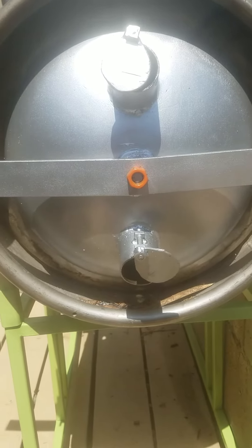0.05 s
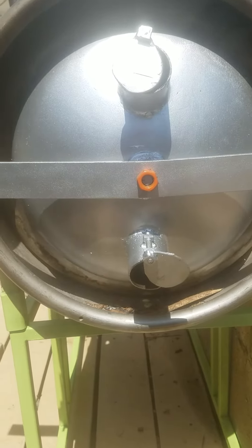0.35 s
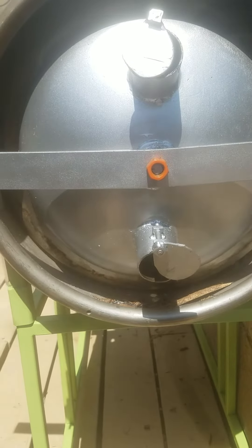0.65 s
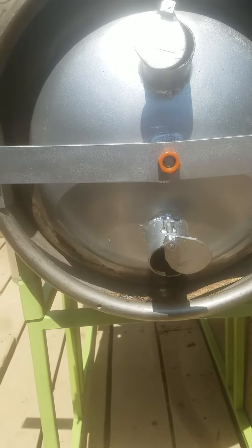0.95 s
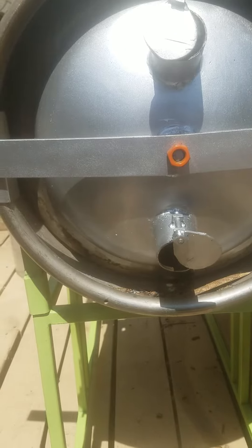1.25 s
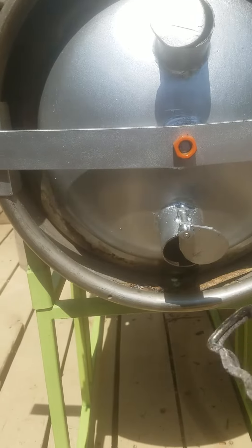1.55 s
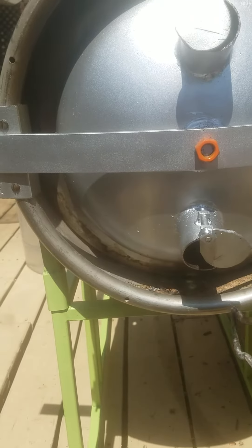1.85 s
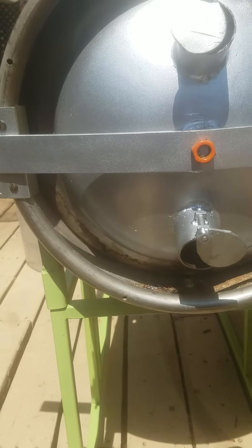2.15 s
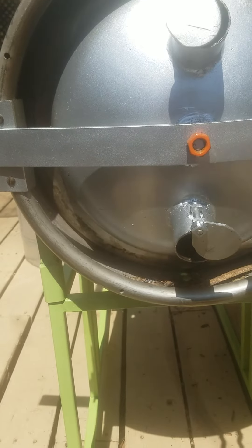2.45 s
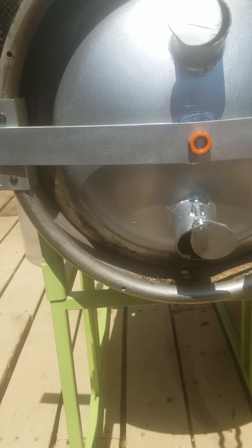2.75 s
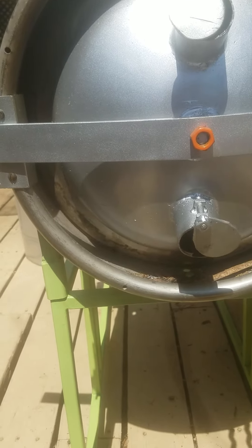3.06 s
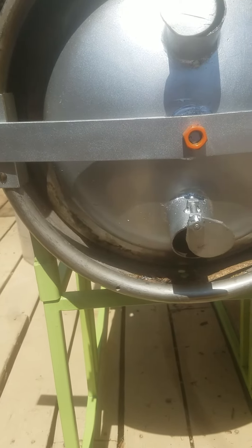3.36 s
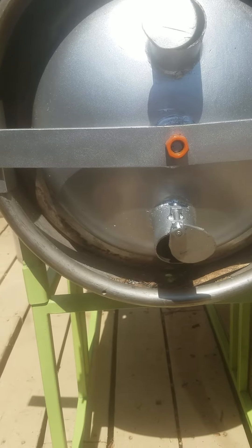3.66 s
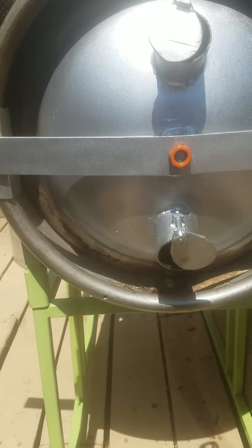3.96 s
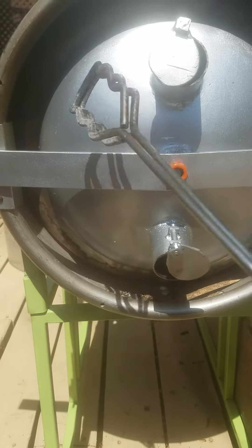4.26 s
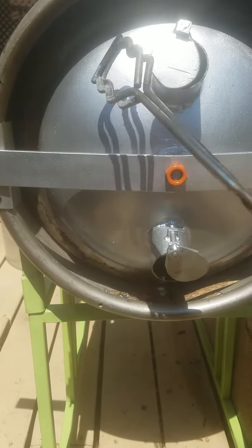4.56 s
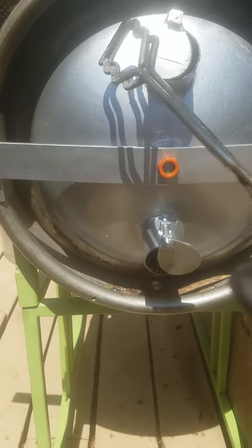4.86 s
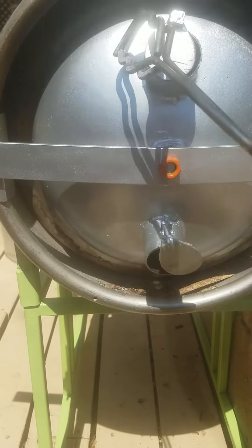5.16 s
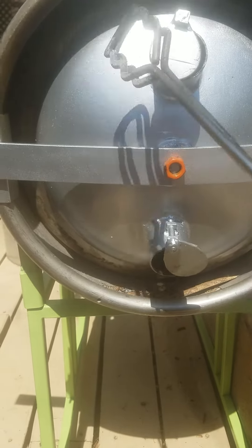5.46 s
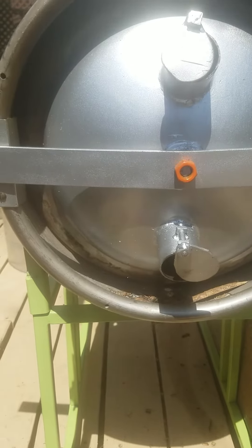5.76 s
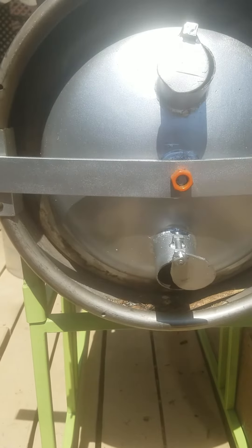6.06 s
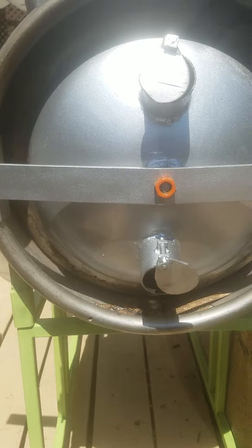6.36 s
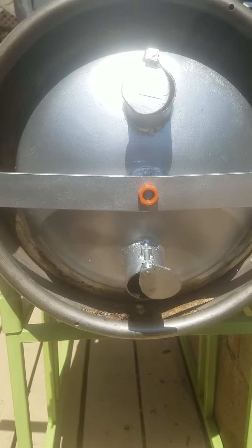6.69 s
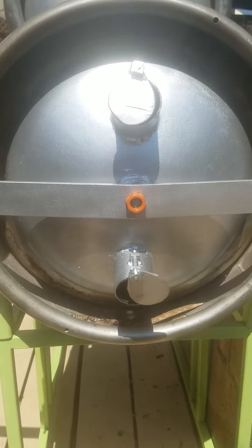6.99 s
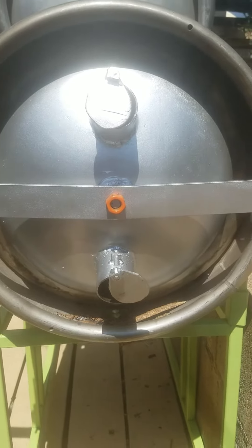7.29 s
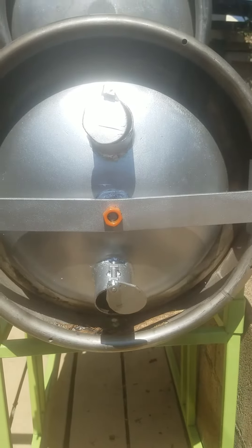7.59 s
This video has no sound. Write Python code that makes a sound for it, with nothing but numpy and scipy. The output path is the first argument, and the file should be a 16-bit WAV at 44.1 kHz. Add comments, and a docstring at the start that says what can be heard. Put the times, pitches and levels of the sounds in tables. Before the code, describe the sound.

Metal tongs tick faintly as they are handled, then give one bright, sharp click. They knock once on the rim of a steel keg, which rings briefly. After a pause come three quick, chattering taps on the keg's dome, each with a short metallic ring and a faint low boom. A few small ticks and a soft bump follow. It is all close by, outdoors, over a faint machine hum and distant rush.

```python
"""Steel tongs on a steel keg

Outdoors on a wooden deck, wire tongs click, knock once on the rim of an upturned keg, then tap
its domed end three times. Each hit bounces and sets the steel ringing: a few clear tones (modes)
and a wash of tones so crowded that they sound like noise. The tongs tick and slip in the hand,
which bumps softly once. A machine hums over the rush of the neighbourhood."""
import sys
import numpy as np
from scipy import signal
from scipy.fft import rfft, irfft, next_fast_len
from scipy.io import wavfile

SR = 44100
rng = np.random.default_rng(int(sys.argv[2]) if len(sys.argv) > 2 else 0)


def wrap_up_sound(samples):
    """Save the sound to the file named by the first command line argument, as 16-bit audio."""
    columns = np.atleast_2d(samples).T
    # keep every value between -1 and 1, then stretch to whole-number steps
    tamed = np.clip(columns, -1, 1)
    steps = np.round(tamed * 32767).astype(np.int16)
    wavfile.write(sys.argv[1], SR, steps)


N = 340893
RING_SIZE = 2 ** 15   # longest ring, in samples

# taps on the dome: (time [s], strength [dB], brightness [dB/octave], bounces weaker by [dB],
# chatter length [s], boom level [dB])
DOME_TAPS = [(4.3879, 1, -0.24, 15, .018, -34.5), (4.6877, 1.5, 0.2, 6, .055, -30.5),
             (4.9973, 4, 0.04, 6, 0.027, -36)]
# how long the keg's wash lasts: (pitch [Hz], time to fade by 60 dB [s])
KEG_DECAY = [(200, 0.19), (1000, 0.32), (3000, 0.18), (6000, 0.17), (14000, 0.11)]
# the microphone's two openings: (pitch [Hz], how alike they sound [0-1], left one's lead [radians])
MIC_PORTS = [(60, .72, 0), (130, .88, 0), (400, .62, .5), (750, .6, .1), (1100, .5, -.3), (1400, .4, .2),
             (1750, .6, 2.3), (2400, .45, 2.1), (3300, .15, .5), (6000, .05, 0)]


def dome(ring_db=-0.05):
    """Three chattering taps ring the dome; after two, the tongs fall back with a hollow knock."""
    # the dome's clear tones: (pitch [Hz], level [dB], fade time [s], left over right [dB])
    modes = [(745, -41, .2, 0), (770, -37, .22, -1), (910, -42, .28, 0), (1063, -28, .2, -2),
             (1148, -37, .25, -5), (1255, -43, .25, 1), (1410, -42, .2, 5), (1665, -23.5, .09, 1),
             (1755, -18.5, .1, 0), (1855, -28, .13, 3), (2144, -39, .3, 3), (2177, -37, .28, -1),
             (2627, -45, .42, 7), (2850, -34, .12, 7), (3040, -45, .3, 0), (3215, -25.5, .23, 1),
             (3320, -27, .21, -2), (3470, -39, .17, -3), (3540, -40, .17, 0), (3952, -41, .2, 6),
             (4135, -39.5, .21, -4), (4850, -47, .2, 0), (5980, -48.5, .15, 4), (8780, -48, .13, 0)]
    # the dome's crowded tones: (pitch [Hz], level [dB])
    spectrum = [(90, -52), (300, -25), (620, -24.5), (780, -23.5), (1100, -10.5), (1400, -17.5),
                (1750, -14), (2500, -17.5), (3200, -11), (3900, -19.5), (6000, -23), (8500, -25.5),
                (10300, -36.5), (12000, -21), (15500, -27.5)]
    # the tongs fall back: (time [s], strength [dB], brightness [dB/octave], hollow knock [dB])
    rebounds = [(4.721, -5.5, -3, -9.5), (5.055, -11.5, -3.5, 1.5)]
    # the hollow knock's tone colour: (pitch [Hz], level [dB])
    hollow_spectrum = [(200, -34.5), (420, -22), (540, -18.5), (650, -26), (780, -1), (930, -25.5),
                       (1080, -12), (1300, -20), (2500, -30), (6000, -53.5)]
    # how long it lasts: (pitch [Hz], fade time [s])
    hollow_decay = [(500, 0.17), (1100, 0.13), (4000, .1)]
    taps = chatter(DOME_TAPS, lag_s=.005, gap_s=.0088, fade_db=16)
    taps = sorted(taps + [(s, db, tilt_db) for s, db, tilt_db, _ in rebounds])
    # the hollow knock comes twice, as each arm lands
    falls = [(s + lag_s, db, 0) for s, _, _, db in rebounds for lag_s in (0, .0088)]
    tones = from_db(ring_db) * ring(taps, modes, build_cycles=1.8, jolt=.6)
    clash = wash(taps, spectrum, KEG_DECAY, crack_db=.53, crack_t60=.025, ripple_db=5.5)
    hollow = wash(falls, hollow_spectrum, hollow_decay, crack_db=.53, crack_t60=.025, ripple_db=-4)
    return tones + panned(1.0) * clash + hollow


def boom(air_hz=128.3, end_hz=133.7, end_share=0.19, t60=0.58, build_s=.012):
    """Two close low tones give each tap a low boom that fades unevenly."""
    out, t = np.zeros((2, N)), np.arange(RING_SIZE) / SR
    lag = 2 * np.pi * (end_hz - air_hz) * 0.078   # the two swing together a moment after the tap
    pair = np.sin(2 * np.pi * air_hz * t) + end_share * np.sin(2 * np.pi * end_hz * t - lag)
    tone = pair * fade(t, t60) * (1 - np.exp(-t / build_s))
    for s, *_, db in DOME_TAPS:
        add(out, from_db(db) * tone[None], s)
    return out


def rim(ring_db=3.0):
    """One bouncing knock rings the keg's rim."""
    # the knock: (time [s], strength [dB], brightness [dB/octave], bounces weaker by [dB], length [s])
    hits = [(2.4966, -3, -1.55, 5, 0.027)]
    # the rim's clear tones: (pitch [Hz], level [dB], fade time [s], left over right [dB])
    modes = [(378, -35, .15, 3), (530, -33, .14, 4), (745, -36, .14, 1), (923, -29, .11, 2),
             (1036, -15.5, .08, 1), (1060, -16.5, .08, 0), (2177, -27.5, .23, 6), (2255, -29.5, .16, 5),
             (2574, -28, .44, -3), (3215, -29, .19, 0), (3320, -37, .24, -1), (3466, -36, .17, 3),
             (3541, -35, .17, 0), (3831, -40, .23, -5), (3904, -39, .21, 5), (4135, -41, .22, 4),
             (4524, -42, .22, 0), (7348, -48, .13, 3)]
    # the rim's crowded tones: (pitch [Hz], level [dB])
    spectrum = [(150, -50), (400, -18.5), (1000, -21), (1300, -21), (2000, -20.5), (2250, -7.5),
                (2900, -12), (3300, -10), (4400, -17.5), (5400, -20), (6300, -34), (7400, -20.5),
                (9000, -32.5), (15000, -30)]
    knocks = chatter(hits, lag_s=.005, gap_s=.0105, fade_db=15)
    tones = from_db(ring_db) * ring(knocks, modes, build_cycles=5.5, jolt=.3)
    clash = wash(knocks, spectrum, KEG_DECAY, crack_db=4.2, crack_t60=.029, ripple_db=7)
    return tones + panned(3.6) * clash


def tong_clicks(ring_db=-1.0):
    """The thin steel arms click brightly, and the hand soon stops their ringing."""
    # tip clicks: (time [s], strength [dB], brightness [dB/octave], bounces weaker by [dB], length [s])
    clicks = [(.0897, -23, -5, 0, 0), (.5477, -20, -4, 0, 0), (.617, -15, -4.5, 0, 0),
              (.856, -23.5, -0.5, 9, 0.016), (.9328, -22, -8.5, 0, 0), (1.3887, -18, -4.5, 0, 0),
              (1.51, -26.5, -7, 0, 0), (1.9912, 1.5, 0.3, 7.5, .035), (3.098, -20.5, -10, -5, 0.00074),
              (5.597, -35, -2.5, -1, 0.0014)]
    # the arms' clear tones: (pitch [Hz], level [dB], fade time [s], left over right [dB])
    modes = [(1977, -40, 0.0826, 4), (3300, -44, 0.1, -4), (3750, -45.5, 0.073, 0.5), (4188, -47, 0.1, 1),
             (4860, -47, 0.1154, 1), (7250, -45.5, 0.067, 3), (10560, -43, 0.0713, -2.5),
             (11700, -32.5, 0.07, -2.5), (12050, -35.5, 0.092, -3.5), (14600, -39.5, 0.07, 2)]
    # the arms' crowded tones: (pitch [Hz], level [dB])
    spectrum = [(300, -44.5), (1200, -30.5), (2200, -23.5), (2700, -33), (3700, -26.5), (5200, -26.5),
                (7500, -27), (9200, -36), (10800, -21.5), (12200, -5), (15500, -19)]
    # how long those last: (pitch [Hz], fade time [s])
    decay = [(1000, 0.044), (4000, 0.089), (13000, 0.033)]
    touches = sorted(chatter(clicks, lag_s=.014, gap_s=.0166, fade_db=4) + stray_ticks())
    tones = from_db(ring_db) * ring(touches, modes, build_cycles=2.5, jolt=0.39)
    return tones + wash(touches, spectrum, decay, crack_db=2.7, crack_t60=.0032, ripple_db=.5)


def stray_ticks(from_s=.7, to_s=.98, per_s=28, db=-27.5, spread_db=1, tilt_db=-9):
    """The tips touch faintly at random moments as the tongs are picked up."""
    span_s = to_s - from_s
    chance = rng.random((round(per_s * span_s), 2))
    return [(from_s + when * span_s, db + spread_db * (2 * size - 1), tilt_db) for when, size in chance]


def tong_slips(free_db=7.5, muffled_db=-7, width_hz=200):
    """The tongs slip and catch in the hand, which muffles all but the tones near one pitch."""
    # slips: (time [s], strength [dB], brightness [dB/octave], later catches weaker by [dB],
    # length [s], pitch left free [Hz])
    slips = [(0.5592, -3.5, 2.5, -0.5, 0.025, 3670), (5.955, -4.5, -1.5, 0, 0, 2400),
             (5.974, -7, 0.5, 0, 0, 2400), (6.288, 0, -5, 4, 0.0029, 2850), (6.468, -6.5, -2.5, 0, 0, 1590),
             (7.0825, 1.5, -8, 8.5, 0.024, 3600), (7.117, -4.5, 1, 6, 0.01, 3370)]
    # the held end's clear tones: (pitch [Hz], level [dB], fade time [s], left over right [dB])
    grip_modes = [(1553, -44.5, 0.082, 2), (2400, -50.5, 0.071, 9), (2900, -45, 0.042, -2),
                  (3300, -48, 0.049, 0), (3670, -54, 0.06, 3), (5800, -74, .06, 0)]
    # a slip's crowded tones: (pitch [Hz], level [dB])
    spectrum = [(300, -47), (1100, -52), (1600, -35.5), (2000, -35.5), (2800, -34), (3700, -33),
                (4700, -34), (6300, -35.5), (9500, -45), (12000, -37), (15500, -46)]
    # how long those last: (pitch [Hz], fade time [s])
    decay = [(1500, 0.032), (4000, 0.062), (13000, 0.068)]
    out = np.zeros((2, N))
    for *slip, free_hz in slips:
        catches = chatter([slip], lag_s=0.0045, gap_s=0.0049, fade_db=5)
        modes = []
        for hz, db, t60, pan_db in grip_modes:
            freedom = np.exp(-((hz - free_hz) / width_hz) ** 2)
            modes.append((hz, db + muffled_db + (free_db - muffled_db) * freedom, t60, pan_db))
        out += ring(catches, modes, build_cycles=4.0, jolt=0.91)
        out += wash(catches, spectrum, decay, crack_db=1.9, crack_t60=.022, ripple_db=6)
    return out


def chatter(hits, lag_s, gap_s, fade_db):
    """Hits and their fading bounces, as contacts: (time [s], strength [dB], brightness [dB/octave])."""
    contacts = []
    for s, db, tilt_db, drop_db, length_s, *_ in hits:
        contacts.append((s, db, tilt_db))
        for t in np.arange(lag_s, length_s, gap_s):
            contacts.append((s + t, db - drop_db - fade_db * t / length_s, tilt_db))
    return contacts


def ring(contacts, modes, build_cycles, jolt):
    """Each contact feeds the clear tones and jolts them out of step; low ones build up slowest."""
    out, t = np.zeros((2, N)), np.arange(RING_SIZE) / SR
    times, dbs, tilts_db = np.transpose(contacts)
    gaps = np.diff(np.round(times * SR), append=N)   # samples until the next contact
    lengths = np.clip(gaps, 1, RING_SIZE).astype(int)
    for hz, level_db, t60, pan_db in modes:
        strengths = from_db(dbs + level_db) * hardness(hz, tilts_db)
        built, dying = 1 - np.exp(-t * hz / build_cycles), fade(t, t60)
        height, phase = 0, 0
        chances = rng.standard_normal(len(times))
        for s, strength, length, chance in zip(times, strengths, lengths, chances):
            envelope = np.hypot(height, strength * built[:length]) * dying[:length]
            shift = jolt * chance * strength / (strength + height)
            angle = phase + 2 * np.pi * hz * (t[:length] + 1 / SR) + shift * built[:length]
            add(out, panned(pan_db) * envelope * np.sin(angle), s)
            height, phase = envelope[-1], angle[-1]
    return out


def wash(contacts, spectrum, decay, crack_db, crack_t60, ripple_db):
    """Each contact wakes a crowd of tones: a short crack, then noise whose bands fade at their own pace."""
    size = RING_SIZE // 2
    out, t, hz = np.zeros((2, N)), np.arange(size) / SR, np.fft.rfftfreq(size, 1 / SR)
    centres, t60s = np.transpose(decay)
    bands = at_hz(np.column_stack([centres, np.eye(len(centres))]), hz)   # overlapping pitch ranges
    crack = from_db(crack_db) * fade(t, crack_t60)
    envelopes = [np.hypot(fade(t, t60), crack) for t60 in t60s]
    body = ripple(size, ripple_db)
    for s, db, tilt_db in contacts:
        bins = noise_bins(spectrum, size) * body * from_db(db) * hardness(hz, tilt_db)
        add(out, sum(irfft(bins * band) * envelope for band, envelope in zip(bands, envelopes)), s)
    return out


def ripple(size, depth_db, spacing_hz=45):
    """Random peaks and gaps between one object's tones, different for left and right."""
    steps = np.fft.rfftfreq(size, 1 / SR) / spacing_hz
    peaks = np.clip(rng.standard_normal((2, size // 8)), -2, 2)
    curves = np.array([np.interp(steps, np.arange(len(row)), row) for row in peaks])
    return rms_one(from_db(depth_db * curves))


def hardness(hz, tilt_db, pivot_hz=2500):
    """A hard contact favours the treble, a soft one the bass."""
    return from_db(tilt_db * np.log2(np.maximum(hz, 600) / pivot_hz))


def machine_hum(waver_hz=1.292, flutter_db=1.34):
    """A far machine's wavering tones swell as the microphone moves through their loud spots."""
    # hum tones: (pitch [Hz], peak level [dB], peak time [s], half-width [s], drop away from peak [dB])
    tones = [(71.3, -60.5, 1.16, 0.66, 6.5), (145, -55, 0.56, 1.6, 12), (231.1, -56.5, 2.78, 0.97, 10.5),
             (333, -61, 3.0, 0.95, 6.5), (376, -55, .8, 1.27, 19.5), (377.3, -58.5, 2.55, 0.66, 10.5)]
    t, out = np.arange(N) / SR, 0
    for hz, db, peak_s, width_s, depth_db in tones:
        away = 1 - np.exp(-((t - peak_s) / width_s) ** 2)
        phase = 2 * np.pi * np.cumsum(hz + waver_hz * drift(1.446)) / SR
        out = out + from_db(db - depth_db * away + flutter_db * drift(2.2)) * np.sin(phase)
    return panned(.6) * np.sqrt(2) * out


def outdoors(rumble_db=-53.5, fall_db_per_s=0.43, rush_lift_db=0.59, waver_db=.5, hiss_db=-68):
    """A slowly fading low rumble and a soft far-off rush, over the microphone's hiss."""
    # the rumble's tone colour: (pitch [Hz], level [dB])
    rumble_spectrum = [(20, -19.5), (45, 4), (70, -3.5), (110, 4), (200, 2), (400, 0.5), (520, -8.5),
                       (900, -41.5)]
    # the rush's tone colour: (pitch [Hz], level [dB])
    rush_spectrum = [(200, -30), (380, -8), (500, 0.5), (900, -0.5), (1150, -4), (1600, -9), (2400, -15),
                     (3500, -26), (6000, -39.5), (12000, -72)]
    # the rush's rise and fall: (time [s], level [dB])
    rush_levels = [(0.0, -49), (0.6, -48.5), (1.51, -50.5), (3.7, -50), (4.82, -48), (6.76, -50),
                   (7.73, -50.5)]
    # the hiss's tone colour: (pitch [Hz], level [dB])
    hiss_spectrum = [(1500, -28), (3500, 0), (6000, -1), (9000, -8), (12000, -1), (15500, 1)]
    t = np.arange(N) / SR
    rush_db = np.interp(t, *np.transpose(rush_levels)) + rush_lift_db
    rumble = from_db(rumble_db - fall_db_per_s * t + waver_db * drift(2)) * steady_noise(rumble_spectrum)
    rush = from_db(rush_db + waver_db * drift(3.4)) * steady_noise(rush_spectrum)
    hiss = from_db(hiss_db) * steady_noise(hiss_spectrum)
    return panned(0.54) * rumble + panned(3.7) * rush + panned(1.4) * hiss


def hand_bump(start_s=6.913, db=-41, rise_s=0.0032, t60=0.47):
    """A soft bump of the hand makes a dull thud that swells briefly and dies."""
    # the thud's tone colour: (pitch [Hz], level [dB])
    spectrum = [(40, -24), (90, -2), (130, 3.5), (190, -2), (280, -11), (450, -2.5), (900, -34),
                (3000, -75)]
    t = np.maximum(np.arange(N) / SR - start_s, 0)
    return from_db(db) * (1 - np.exp(-t / rise_s)) * fade(t, t60) * steady_noise(spectrum)


def noise_bins(spectrum, size):
    """Spectrum of stereo noise whose two sides are alike in the bass and unrelated in the treble."""
    hz = np.fft.rfftfreq(size, 1 / SR)
    mid, side = rfft(rng.standard_normal((2, size)))
    alike = at_hz(MIC_PORTS, hz)[0]
    pair = np.sqrt((1 + alike) / 2) * mid + np.sqrt((1 - alike) / 2) * side * [[1], [-1]]
    return pair * from_db(at_hz(spectrum, hz)[0])


def steady_noise(spectrum):
    """Stereo noise of a given tone colour, for the whole scene."""
    size = next_fast_len(N)
    return rms_one(irfft(noise_bins(spectrum, size), size)[:, :N])


def drift(rate_hz, block=64):
    """Smooth random wandering, typically about 1 either way."""
    count = next_fast_len(N // block + 2)
    hz = np.fft.rfftfreq(count, block / SR)
    slow = irfft(rfft(rng.standard_normal(count)) / (1 + (hz / rate_hz) ** 2), count)
    return np.interp(np.arange(N) / block, np.arange(count), rms_one(slow))


def from_db(db):
    """Decibels to gain."""
    return 10 ** (np.asarray(db) / 20)


def rms_one(x):
    """Scale to an average power of 1."""
    return x / np.sqrt(np.mean(x ** 2) + 1e-20)


def at_hz(rows, hz):
    """Read each column of a table at the given pitches, gliding between rows."""
    points, *columns = np.transpose(rows)
    return [np.interp(np.log(hz + 1), np.log(points), c) for c in columns]


def panned(db):
    """Two gains that make the left side db louder than the right."""
    return from_db(np.array([[db], [-db]]) / 2)


def fade(t, t60):
    """Die away by 60 dB in t60 seconds, the fade time."""
    return np.exp(-np.log(1000) * t / t60)


def add(out, sound, s):
    """Mix a sound in from time s."""
    start = round(s * SR)
    out[:, start:start + sound.shape[1]] += sound[:, :N - start]


def scene():
    """Everything on the deck."""
    keg = dome() + boom() + rim()
    tongs = panned(1.1) * (tong_clicks() + tong_slips())
    return keg + tongs + machine_hum() + outdoors() + hand_bump()


def record(dry):
    """The microphone's two openings hear the middle pitches out of step; the highest treble is cut."""
    size = next_fast_len(N + RING_SIZE)
    _, lead = at_hz(MIC_PORTS, np.fft.rfftfreq(size, 1 / SR))
    heard = irfft(rfft(dry, size) * np.exp(.5j * lead * [[1], [-1]]), size)[:, :N]
    treble_cut = signal.ellip(10, .1, 80, 16000, fs=SR, output="sos")
    return signal.sosfilt(treble_cut, heard)


dry = scene()
out = record(dry)
wrap_up_sound(out)
```